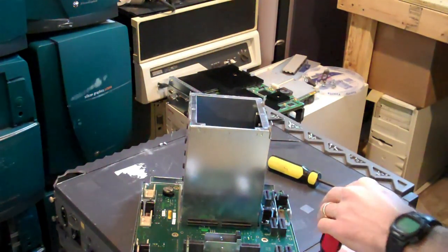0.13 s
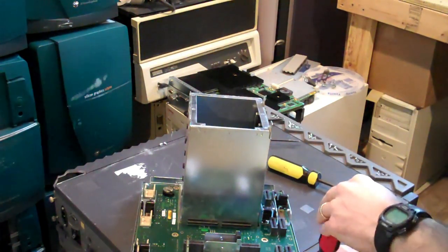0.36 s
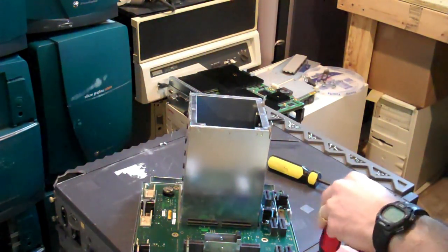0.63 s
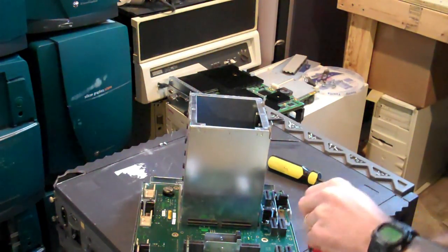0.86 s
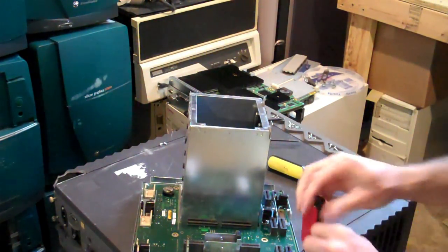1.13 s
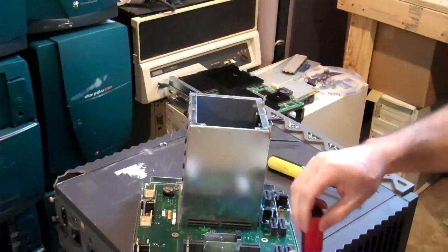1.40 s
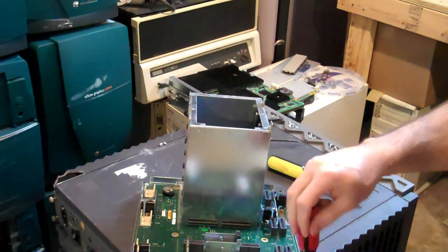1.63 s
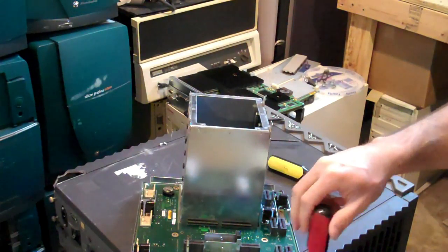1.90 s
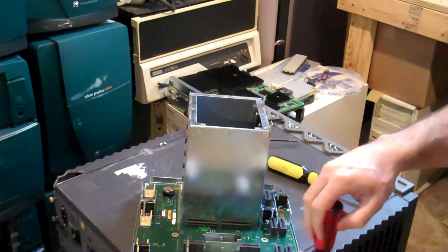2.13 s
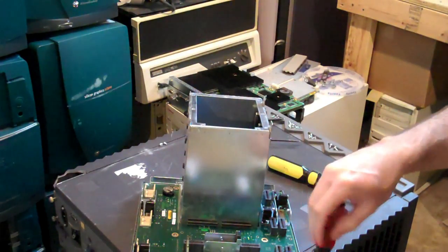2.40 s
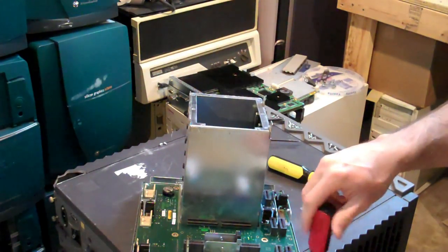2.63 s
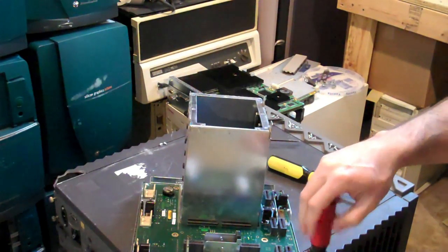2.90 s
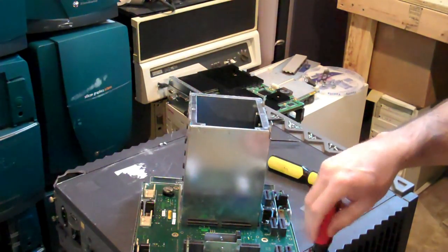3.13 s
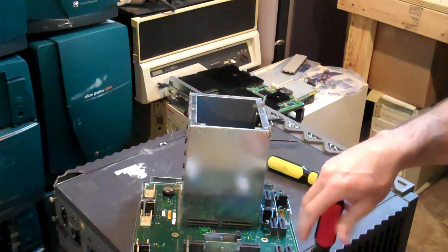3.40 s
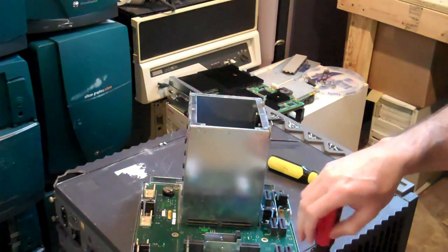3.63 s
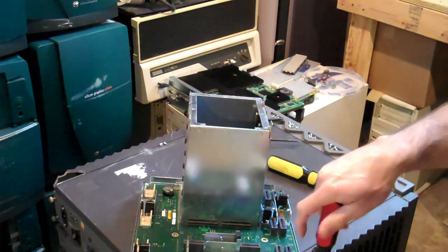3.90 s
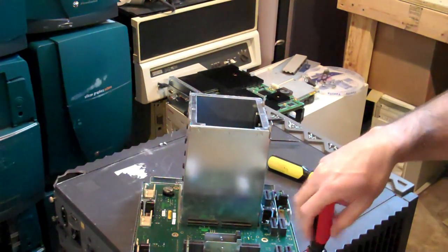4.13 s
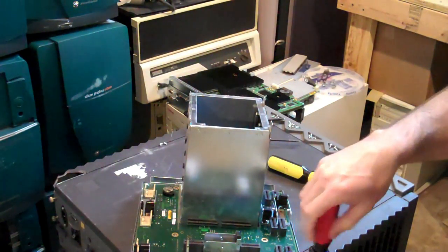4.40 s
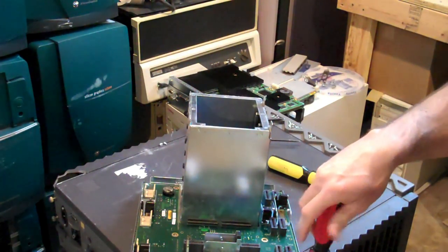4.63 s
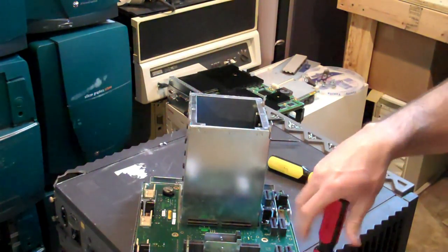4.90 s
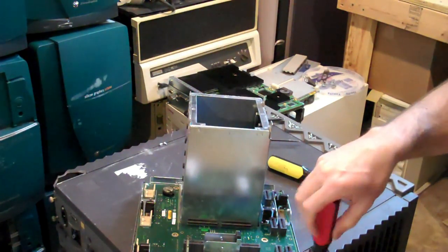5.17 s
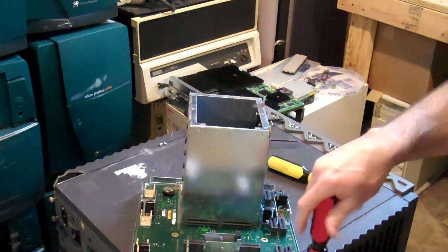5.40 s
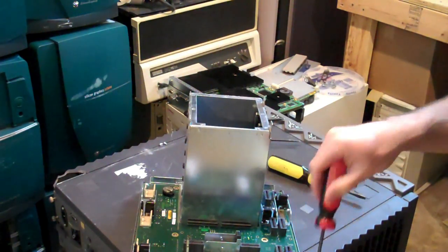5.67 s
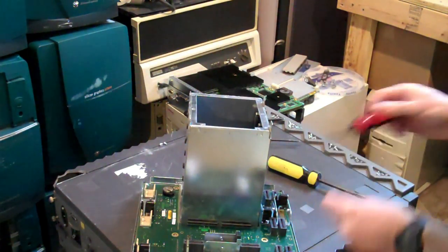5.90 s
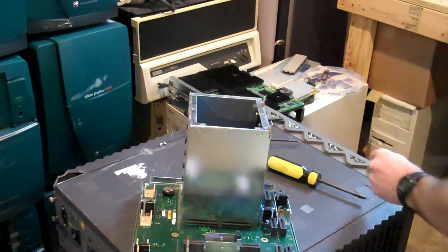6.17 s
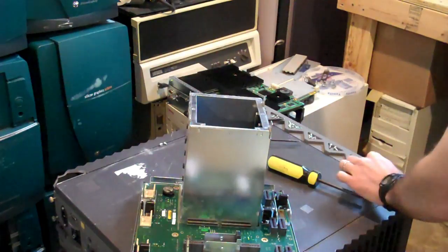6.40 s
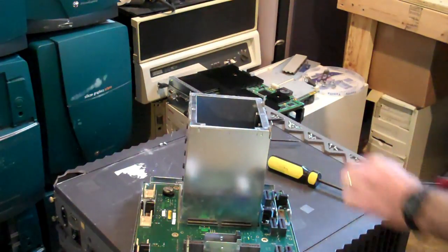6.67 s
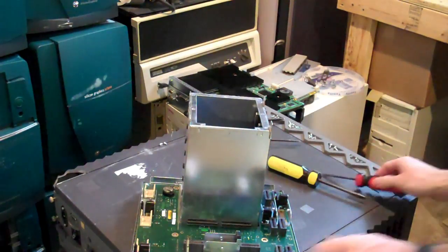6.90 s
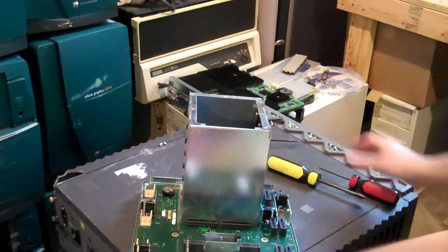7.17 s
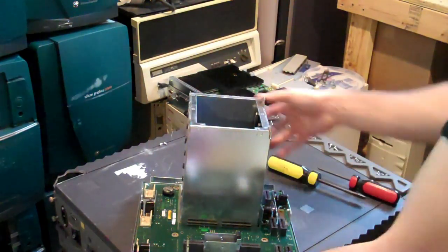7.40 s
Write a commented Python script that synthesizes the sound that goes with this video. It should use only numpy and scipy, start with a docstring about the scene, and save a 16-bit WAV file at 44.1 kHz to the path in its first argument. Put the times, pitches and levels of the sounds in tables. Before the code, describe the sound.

Sparse woody clicks of a screwdriver on a circuit board, a bright scrape, a screw's ping on a metal lid, tool clatter, finger taps.

```python
"""A screwdriver knocks in a screw on a circuit board that lies on a sheet-metal case; hand and tool rub and rustle.
The screw is pulled out, rattles on the tip and drops on the lid; the tool is laid down, fingers brush a metal cage.
Contacts and rubs are grainy noise forces that excite a broad crack, a body's damped modes and a bright edge.
Fingers and sleeve rustle, a small cluttered room answers, and each microphone port has its own hiss."""
import sys
import numpy as np
from scipy import signal
from scipy.fft import rfft, irfft, next_fast_len
from scipy.io import wavfile
from scipy.ndimage import uniform_filter1d

SR = 44100
rng = np.random.default_rng(int(sys.argv[2]) if len(sys.argv) > 2 else 0)


def int16_out(signal):
    """Quantize to a 16-bit WAV file."""
    q = np.round(np.clip(np.atleast_2d(signal).T, -1, 1) * 32767)
    wavfile.write(sys.argv[1], SR, q.astype(np.int16))


def boost(x):
    """Linear amplitude factor 10**(x/20) for a level x in decibels (scalar or array-like)."""
    u = np.asarray(x, float) / 20
    return 10 ** u


N = 332514  # length in samples


def unit(x):
    """Scales a signal to rms 1."""
    return x / np.sqrt(np.mean(x ** 2) + 1e-20)


def along(points, hz):
    """Reads a curve of (frequency [Hz], value) points on a log frequency axis."""
    f, v = np.transpose(points)
    return np.interp(np.log(hz + 1), np.log(f + 1), v)


def filtered(x, response):
    """Filters x by a complex response of frequency."""
    m = next_fast_len(x.shape[-1] + SR // 2, real=True)
    spectrum = rfft(x, m) * response(np.fft.rfftfreq(m, 1 / SR))
    return irfft(spectrum, m)[..., :x.shape[-1]]


def colour(spectrum):
    """Minimum-phase impulse response of a spectrum, with unit energy: it starts at once, like a blow."""
    size = 2 ** 11
    cepstrum = irfft(np.log(boost(along(spectrum, np.fft.rfftfreq(size, 1 / SR)))))
    # folding the cepstrum onto positive time makes the response causal
    cepstrum[1:size // 2] *= 2
    cepstrum[size // 2 + 1:] = 0
    return unit(irfft(np.exp(rfft(cepstrum)))) / np.sqrt(size)


def ringing(modes, tilt_db=0):
    """Damped sines with unit energy, their levels and tunings scattered anew; light objects favour the high ones."""
    t = np.arange(SR // 4) / SR
    hz, db, t60 = np.transpose(modes)[..., None]
    scatter, detune = rng.standard_normal((2, len(modes), 1))
    db = db + 2 * scatter + tilt_db * np.log2(hz / 1000)  # tilt in dB per octave
    sign = (-1) ** np.arange(len(modes))[:, None]  # neighbouring modes swing in opposite senses
    sines = np.sin(2 * np.pi * hz * (1 + 0.0077 * detune) * t)
    ring = (sign * boost(db - 60 * t / t60) * sines).sum(0)
    return ring / np.linalg.norm(ring)


def grit(count, spiky):
    """Noise of tiny impacts whose sizes scatter more as spiky grows."""
    swell = uniform_filter1d(rng.standard_normal(count), size=24) * np.sqrt(24)
    return unit(rng.standard_normal(count) * np.exp(spiky * swell))


# middle crack of a contact: (frequency [Hz], relative level [dB])
CRACK_SPECTRUM = [(300, -25.5), (800, 1.5), (1500, 0), (2200, 7.5), (3200, -1.5), (4200, 3.5),
                  (6000, -27.5), (9000, -32)]
# duller crack on the board: (frequency [Hz], relative level [dB])
BOARD_CRACK_SPECTRUM = [(300, -16), (600, -19.5), (1000, -9), (1600, 3), (2300, 2), (3200, -6), (4500, -10),
                        (8000, -53)]
# bright edge of a contact: (frequency [Hz], relative level [dB])
EDGE_SPECTRUM = [(1000, -64), (2000, -36), (3500, 2), (4500, -2.5), (5300, 5.5), (6200, 9.5), (7400, 7),
                 (8300, -6), (10000, -19.5), (14000, -26), (16000, -41)]


def voiced(forces, modes, tilt_db=0):
    """Three force trains sound in the middle crack (duller on the board), the body's modes and the bright edge."""
    crack = BOARD_CRACK_SPECTRUM if modes is BOARD_MODES else CRACK_SPECTRUM
    rings = colour(crack), ringing(modes, tilt_db), colour(EDGE_SPECTRUM)
    mid = sum(signal.oaconvolve(force, ring)[:len(force)] for force, ring in zip(forces, rings))
    # nearby parts scatter treble to each side
    t = np.arange(SR // 100) / SR
    echo = np.diff(rng.standard_normal(len(t) + 1)) * boost(-60 * t / 0.0077)
    side = boost(1.5) * signal.oaconvolve(mid, echo / np.linalg.norm(echo))[:len(mid)]
    return np.array([mid + side, mid - side])


def contacts(rows, modes, spiky, blow, pan_db, tilt_db=0):
    """Every contact is a first blow and a flurry of micro-impacts that chatters, dies and settles.

    rows: (time [s], level [dB], body [dB over level], edge [dB over level], chatter length [s]);
    pan_db: left over right, scattered per contact."""
    crack_db = -7.5  # over the contact's level
    settle_db, settle_t60_s = -22.5, 0.41  # loose parts settle after a contact
    out, t = np.zeros((2, N + SR)), np.arange(SR // 2) / SR
    settling = boost(settle_db - 60 * t / settle_t60_s)
    for s, db, body_db, edge_db, length in rows:
        chatter = boost(-30 * t / length - 21.4 * (t / length) ** 2)
        shape = (1 - np.exp(-t / 0.00079)) * (chatter + settling)
        flurry = grit(len(t), spiky) * shape
        flurry *= np.linalg.norm(shape) / np.linalg.norm(flurry)
        flurry[0] = blow * np.linalg.norm(shape)
        levels = boost(db + np.array([[crack_db], [body_db], [edge_db]]))
        sound = voiced(flurry * levels, modes, tilt_db)
        pan = pan_db + 1.5 * rng.standard_normal()
        out[:, round(s * SR):][:, :len(t)] += sound * boost(pan * np.array([[.5], [-.5]]))
    return out[:, :N]


def strokes(rows, modes, spiky, rise):
    """A grainy rub swells in over a share (rise) of its length, sags 4 dB and lifts off.

    rows: (start [s], length [s], level [dB], body [dB over level], edge [dB over level])."""
    out, t = np.zeros((2, N + SR)), np.arange(SR // 2) / SR
    for start, length, db, body_db, edge_db in rows:
        swell = np.clip(t / (rise * length), 0, 1)
        sag = boost(-4 * np.clip(t / length, 0, 1))
        lift = np.clip(1 - (t - length) / 0.004, 0, 1)
        levels = boost(db + np.array([[0], [body_db], [edge_db]]))
        force = grit(len(t), spiky) * swell * sag * lift
        out[:, round(start * SR):][:, :len(t)] += voiced(force * levels, modes)
    return out[:, :N]


def drag(rows, modes, spiky):
    """A long rub whose crack, body and edge follow level curves: (time [s], crack [dB], body [dB], edge [dB])."""
    s, *levels_db = np.transpose(rows)
    t = np.arange(N) / SR
    levels = boost([np.interp(t, s, c, left=-120, right=-120) for c in levels_db])
    return voiced(grit(N, spiky) * levels, modes)


# tip against screw and board: (time [s], level [dB], board [dB over level], bright edge [dB over level])
TIP_KNOCKS = [(0.1715, -50, -3, -19), (0.5127, -53.5, -8, -22), (0.6216, -46.5, -5, -13.5),
              (0.6673, -28, -7, -10), (0.6737, -29.5, -4.5, -13.5), (0.834, -58.5, -13, 5),
              (0.887, -57, 1.5, -24), (0.9991, -65, -13, 8), (1.261, -52, -11, 7.5), (1.3126, -51, -9, 1),
              (1.3435, -50, -24, -1), (1.4388, -53, -4, -9), (1.4798, -32.5, -8.5, -15),
              (1.6823, -54.5, 9.5, -5), (1.9025, -39, -8.5, -21), (2.0088, -51.5, -11, -2.5),
              (2.0994, -23, -9, -13), (2.2179, -28.5, -9, -13.5), (2.5166, -37, -9, -11.5),
              (2.598, -43.5, -2, -25), (2.7159, -44.5, -1, -16), (2.8735, -46, -14, -23),
              (3.1258, -50, -35, -8), (3.3252, -46, -3.5, -33), (3.3804, -50, -8, -12),
              (3.7335, -37.5, -6, -13), (3.9607, -53.5, -8, 2), (4.78, -47.5, 1.5, -29),
              (4.853, -45.5, -2, -24), (5.0062, -53.5, 2.5, -21), (5.2377, -45.5, -11.5, -11.5),
              (5.2952, -54.5, -4, -5), (5.3184, -52, -3, -25)]
# circuit board modes: (nominal frequency [Hz], nominal level [dB], t60 [s])
BOARD_MODES = [(216.4, -10, 0.24), (257.5, -7.5, 0.34), (331.4, -3, 0.4), (404, -5.5, 0.14),
               (441, -1, 0.18), (505, -1, 0.047), (575, -3, 0.09), (626, 5, 0.027), (685, 5.5, 0.087),
               (729, 1.5, 0.057), (818, 6, 0.043), (930, 1, 0.03), (1022, 2, 0.04), (1205, -2.5, 0.061),
               (1340, -3, 0.074)]


def tip_knocks():
    """The tip knocks against screw and board, and the board's low modes ring."""
    rows = [(*row, 0.052) for row in TIP_KNOCKS]  # chatter length [s]
    return contacts(rows, BOARD_MODES, spiky=0.23, blow=0.19, pan_db=-2.2)


# short rubs and rustles of the hand and tool:
# (start [s], length [s], level [dB], bright edge [dB over level])
TOOL_RUBS = [(0.124, 0.059, -64.5, -5), (1.044, 0.073, -71, 3), (1.653, 0.047, -55, -12),
             (1.819, .1, -57.5, 4.5), (2.538, 0.075, -58, 0.5), (2.937, .09, -67, 4.5),
             (3.133, 0.048, -67, 5), (3.236, 0.049, -73, 14), (3.524, 0.047, -71.5, 5),
             (3.668, .04, -72.5, 10), (3.85, 0.044, -80.5, 17), (3.984, 0.15, -68.5, 1),
             (4.4, .08, -78, 10.5), (4.722, .1, -71, 4.5), (4.85, 0.056, -60.5, -7),
             (5.005, 0.035, -76, -12), (5.095, 0.13, -73, 7.5), (5.312, .05, -67, -12)]


def tool_rubs():
    """Short grainy rubs and rustles of the hand and tool, carried by the board."""
    board_db = 3  # over the rub's level
    rows = [(s, length, db, board_db, edge) for s, length, db, edge in TOOL_RUBS]
    return strokes(rows, BOARD_MODES, spiky=0.35, rise=0.23)


# steel tip landing and bouncing on the lid:
# (time [s], level [dB], shaft [dB over level], chatter length [s])
TIP_LANDINGS = [(6.8855, -32, 20, 0.032), (6.8998, -46, 16.5, 0.047), (6.9162, -33.5, 4.5, 0.14),
                (6.9377, -36.5, 5.5, 0.084), (6.9646, -33.5, 1, 0.059)]
# shaft modes, short because the hand holds it, with the lid's longer low thud below 250 Hz: (nominal frequency
# [Hz], nominal level [dB], t60 [s])
SHAFT_MODES = [(147, -25.5, .15), (225, -22, 0.11), (445, -14, 0.013), (1293, -10.5, 0.028),
               (1830, -0.5, 0.01), (3070, -0.5, 0.014), (4800, 5.5, 0.0098), (5130, -5.5, 0.011),
               (5900, 6.5, 0.0063), (7600, -0.5, 0.0044), (9070, -18, 0.0072), (11600, -19, 0.0017)]


def tip_landings():
    """The steel tip lands and bounces on the lid; the hand-damped shaft rings briefly over a low thud of the
    lid."""
    edge_db = -15  # over the contact's level
    rows = [(s, db, shaft, edge_db, length) for s, db, shaft, length in TIP_LANDINGS]
    return contacts(rows, SHAFT_MODES, spiky=0.19, blow=0.77, pan_db=-1.3)


# handle landing and rocking on the lid:
# (time [s], level [dB], lid [dB over level], bright edge [dB over level], chatter length [s])
HANDLE_LANDINGS = [(7.0188, -26, 3, -15, 0.016), (7.035, -32.5, 4.5, -1, 0.012),
                   (7.0573, -23.5, 1.5, -0.5, 0.028), (7.0889, -23, -5, -3, 0.022),
                   (7.0981, -21, -17.5, -3.5, 0.05), (7.12, -34, -1, -6, 0.022),
                   (7.1542, -35, 10.5, -6, 0.027), (7.1671, -33.5, 5, -1.5, 0.053),
                   (7.2001, -42, 9.5, 2, 0.05), (7.2997, -46, -14, 3, 0.036)]
# sheet-metal lid modes: (nominal frequency [Hz], nominal level [dB], t60 [s])
LID_MODES = [(154, -7, 0.22), (200.5, -3.5, 0.21), (234, 2.5, 0.099), (294, 3.5, 0.044), (388, -2.5, 0.13),
             (456, 0.5, 0.064), (613, 10.5, 0.031), (723, 1.5, 0.077), (774, 5, 0.056), (952, 7.5, 0.076),
             (1098, 9.5, 0.03), (1213, 14, 0.023), (1363, 5, 0.037), (1374, 5, 0.054), (1700, 12, 0.011)]


def handle_landings():
    """The handle lands and rocks, and every contact sets the sheet-metal lid ringing."""
    return contacts(HANDLE_LANDINGS, LID_MODES, spiky=0.24, blow=0.27, pan_db=-2.0)


# handle sliding to rest on the lid: (time [s], scrape [dB], lid [dB])
HANDLE_SLIDE = [(7.02, -54, -75), (7.1, -40, -53), (7.141, -41.5, -44), (7.24, -48.5, -42.5),
                (7.27, -58.5, -70), (7.36, -61.5, -72)]


def handle_slide():
    """The handle slides to rest, a rub that drives the lid's modes."""
    edge_db = -1.5  # over the scrape
    rows = [(s, db, lid, db + edge_db) for s, db, lid in HANDLE_SLIDE]
    return drag(rows, LID_MODES, spiky=0.28)


def screwdriver():
    """The tip knocks while hand and tool rub and rustle; at last tip and handle are laid on the lid."""
    return tip_knocks() + tool_rubs() + tip_landings() + handle_landings() + handle_slide()


# screw dragged out past a bracket: (time [s], reference level of the drag [dB])
SCREW_PULL = [(5.393, -58), (5.398, -27.5), (5.425, -28.5), (5.435, -26), (5.446, -35), (5.47, -47),
              (5.52, -63)]
# bracket modes: (nominal frequency [Hz], nominal level [dB], t60 [s])
BRACKET_MODES = [(2070, -1, 0.02), (2610, 8.5, 0.0061), (3200, 13, 0.0011), (3860, -13, 0.0044),
                 (8460, 5, 0.0075), (10500, -21, 0.0008), (12800, 0, 0.0015)]


def screw_pull():
    """The screw drags brightly past a bracket while its thread rubs on the board."""
    bracket_db, scrape_db, board_db = -11, -20.5, -21  # over the drag's level
    pull = drag([(s, -120, db + bracket_db, db) for s, db in SCREW_PULL], BRACKET_MODES, spiky=0.33)
    thread = [(s, db + scrape_db, db + board_db, -120) for s, db in SCREW_PULL]
    pull += drag(thread, BOARD_MODES, spiky=0.42)
    return boost([[2], [-2]]) * pull  # leans left


# loose screw against the tip: (time [s], level [dB], bright edge [dB over level])
SCREW_RATTLES = [(5.494, -44, 19), (5.548, -40, -21), (5.5774, -51, 0), (5.6084, -43, -3),
                 (5.6394, -44, -10), (5.672, -45.5, 0), (5.702, -41, -2), (5.7394, -47, -10),
                 (5.83, -44, -7)]
# screw modes: (nominal frequency [Hz], nominal level [dB], t60 [s])
SCREW_MODES = [(5200, 4, 0.041), (5830, 4, 0.011), (7160, -10, 0.01), (7650, 8, 0.0086)]


def screw_rattle():
    """The loose screw rattles on the tip with a small, high ring."""
    ring_db, chatter_s = -5, 0.011
    rows = [(s, db, ring_db, edge, chatter_s) for s, db, edge in SCREW_RATTLES]
    return contacts(rows, SCREW_MODES, spiky=0.21, blow=0.57, pan_db=0.5)


# screw landing on the lid and bouncing once: (time [s], level [dB])
SCREW_LANDINGS = [(6.4545, -18), (6.5846, -32.5)]


def screw_drop():
    """The light screw hits the lid, favouring its high modes; its other end follows and skids."""
    edge_db = 3.5  # over each contact's level
    delay_s, tumble_db = .016, -12.5  # second end after and over the first
    rows = [(s, db, -11, edge_db, 0.022) for s, db in SCREW_LANDINGS]
    rows += [(s + delay_s, db + tumble_db, -14.5, edge_db, 0.067) for s, db in SCREW_LANDINGS]
    return contacts(rows, LID_MODES, spiky=0.62, blow=0.28, pan_db=-1.2, tilt_db=4.5)


def screw():
    """Pulled out, rattling on the tip, then dropped on the lid."""
    return screw_pull() + screw_rattle() + screw_drop()


# fingers brushing the cage: (time [s], scrape [dB], cage [dB], bright edge [dB])
CAGE_BRUSH = [(7.386, -70, -46, -54), (7.397, -44, -40, -40), (7.407, -42, -37, -34),
              (7.42, -44, -38.5, -40), (7.442, -45, -40, -46), (7.462, -53, -52, -47),
              (7.54, -63, -51, -47)]
# fingers tapping the cage: (time [s], level [dB])
CAGE_TAPS = [(7.466, -35.5), (7.496, -35.5), (7.5264, -32.5)]
# cage modes: (nominal frequency [Hz], nominal level [dB], t60 [s])
CAGE_MODES = [(910, -3, 0.022), (1210, -10, 0.09), (1566, -28, .015), (1700, 15, 0.0068), (2450, 2, .012),
              (4460, 1, 0.015), (5470, 2, 0.026), (5440, 2.5, 0.024)]


def cage():
    """Fingers brush and tap the metal cage, whose modes die within a fraction of a second."""
    cage_db, edge_db, chatter_s = -26, 4, 0.02  # the levels are over the tap's
    taps = [(s, db, cage_db, edge_db, chatter_s) for s, db in CAGE_TAPS]
    brush = drag(CAGE_BRUSH, CAGE_MODES, spiky=0.081)
    return brush + contacts(taps, CAGE_MODES, spiky=0.28, blow=0.47, pan_db=-3)


# fingers and sleeve: (time [s], low rub through the board [dB], rustle [dB])
HAND_MOVES = [(0.0, -70.5, -79), (0.48, -94, -87), (0.7, -75, -69), (0.95, -89, -73), (1.3, -68, -68.5),
              (1.93, -70.5, -69), (2.4, -75, -71), (2.76, -68, -70.5), (3.5, -75.5, -77), (4.4, -88, -76.5),
              (4.92, -71.5, -77), (5.3, -70, -83), (5.5, -64, -63), (5.77, -76, -70.5), (6.25, -70.5, -62),
              (6.45, -74, -71), (6.6, -71, -59), (6.88, -77, -69.5)]


def hand():
    """Fingers and sleeve rustle, with a soft low rub through the board."""
    s, rub_db, rustle_db = np.transpose(HAND_MOVES)
    t = np.arange(N) / SR
    rub, rustle = (boost(np.interp(t, s, c, right=-120)) for c in (rub_db, rustle_db))
    crack_force = boost(-3.0) * rub * grit(N, 0.18)
    board_force = rub * grit(N, 0.81)
    edge_force = rustle * grit(N, 0.17)
    return voiced([crack_force, board_force, edge_force], BOARD_MODES)


# decay of the room: (frequency [Hz], t60 [s])
ROOM_DECAY = [(200, 0.69), (700, 0.39), (2000, 0.27), (6000, 0.21), (12000, 0.072)]
# left-right likeness of the room: (frequency [Hz], correlation [-1 to 1])
ROOM_LIKENESS = [(300, 1), (700, 0.96), (1400, .75), (3000, 0.36), (6000, 0.017)]


def room(x, block=SR // 4):
    """Crossfaded quarter-second stretches each get a fresh noise tail; bass reaches both ports alike."""
    wet, fade = np.zeros((2, N + 2 * SR)), signal.get_window("hann", 2 * block)
    padded = np.pad(x, (block, 2 * block))
    for start in range(0, N + block, block):
        hz, t, z = signal.stft(rng.standard_normal((2, SR // 2)), SR, nperseg=256)
        # this angle shares the power between mid and side to give the likeness
        angle = np.arccos(np.clip(along(ROOM_LIKENESS, hz), -1, 1))[:, None] / 2
        z = z * boost(-60 * t / along(ROOM_DECAY, hz)[:, None]) * [np.cos(angle), np.sin(angle)]
        tail = signal.istft(z, SR, nperseg=256)[1]
        stretch = padded[start:][:2 * block] * fade
        answer = signal.fftconvolve(stretch[None], tail / np.linalg.norm(tail), axes=1)
        wet[:, start:][:, :answer.shape[1]] += answer
    mid, side = wet[:, block - round(.004 * SR):][:, :N]  # the room answers 4 ms late
    return np.array([mid + side, mid - side])


def scene():
    """Contacts and rubs, near and through the room."""
    near = screwdriver() + screw() + cage() + hand()
    return near + boost(-5.5) * room(near.mean(0))


def band_limit(x):
    """A steep low-pass at the top of the band."""
    return signal.sosfilt(signal.butter(12, 15200, fs=SR, output="sos"), x)


# hiss of each port: (frequency [Hz], relative level [dB])
LEFT_HISS = [(25, -4), (100, 3.5), (300, 5.5), (1000, 3), (3000, -2.5), (6000, -8), (10000, -10),
             (15000, -11.5)]
RIGHT_HISS = [(25, 1), (100, -6.5), (300, -3.5), (1000, -4.5), (3000, -5.5), (6000, -7.5), (10000, -10.5),
              (15000, -11)]
# treble of the left port: (frequency [Hz], level over the right port [dB])
LEFT_OVER_RIGHT = [(1000, 0.5), (6500, -1), (9000, 19.5), (14000, 12)]


def record(dry):
    """The ports cut deep bass and top treble; the left is brighter and 20 us later; hiss and opposed rumble join."""
    bass_cut = lambda hz: (1j * hz / (170 + 1j * hz)) ** 4
    treble_cut = lambda hz: 1 / np.sqrt(1 + (hz / 14400) ** 32)
    # half of the level and delay difference goes to each port
    left = lambda hz: boost(along(LEFT_OVER_RIGHT, hz) / 2) * np.exp(-1j * np.pi * hz * 2e-5)
    pair = lambda hz: np.array([left(hz), 1 / left(hz)])
    ports = filtered(dry, lambda hz: bass_cut(hz) * treble_cut(hz) * pair(hz))
    hiss_levels = lambda hz: boost([along(LEFT_HISS, hz), along(RIGHT_HISS, hz)])
    hiss = filtered(rng.standard_normal((2, N)), lambda hz: hiss_levels(hz) * (hz < 14250))
    rumble = filtered(rng.standard_normal(N), lambda hz: 1 / (1 + 1j * hz / 45) ** 2)
    ports = ports + boost(-70) * unit(rumble) * [[1], [-1]]
    mix = ports + boost(-60.5) * unit(hiss)
    return band_limit(mix)


dry = scene()
out = record(dry)
int16_out(out)
```